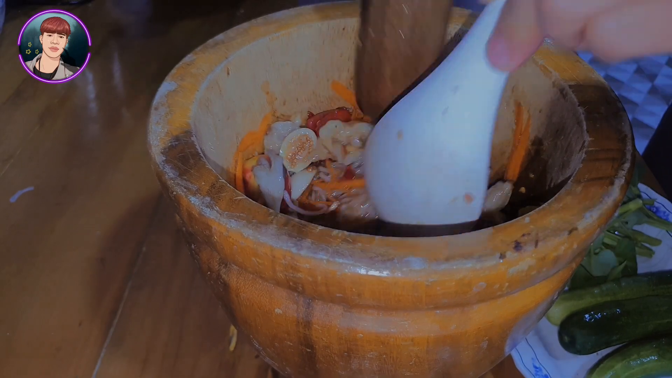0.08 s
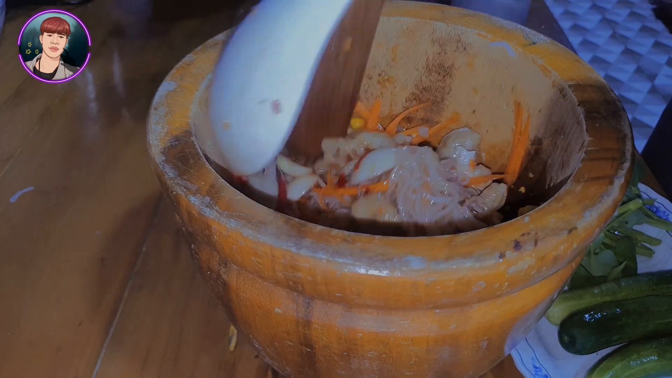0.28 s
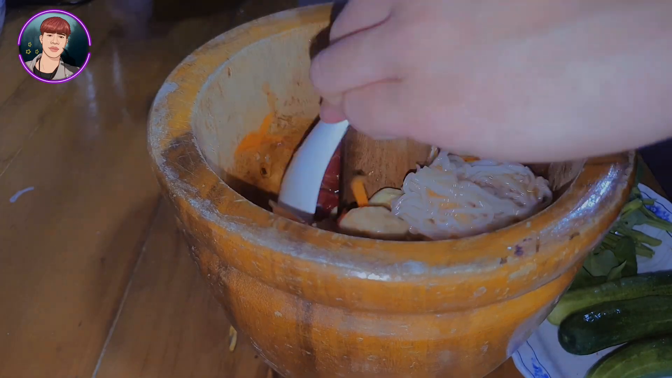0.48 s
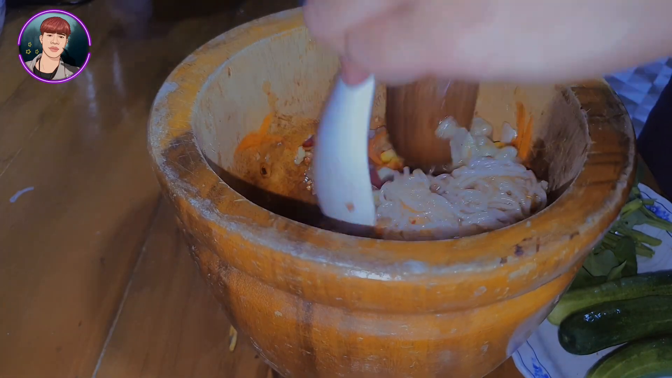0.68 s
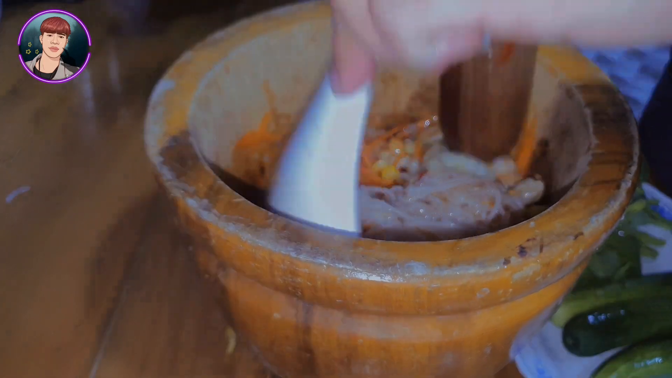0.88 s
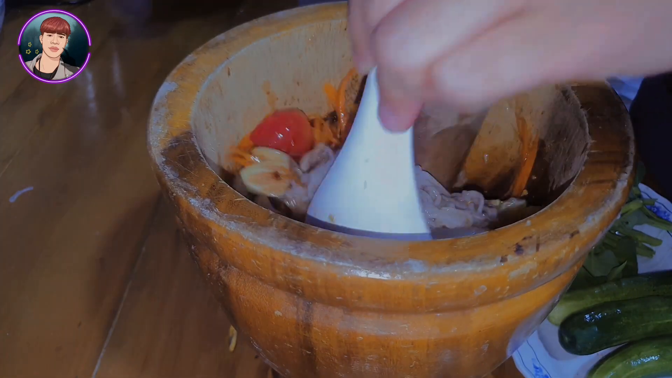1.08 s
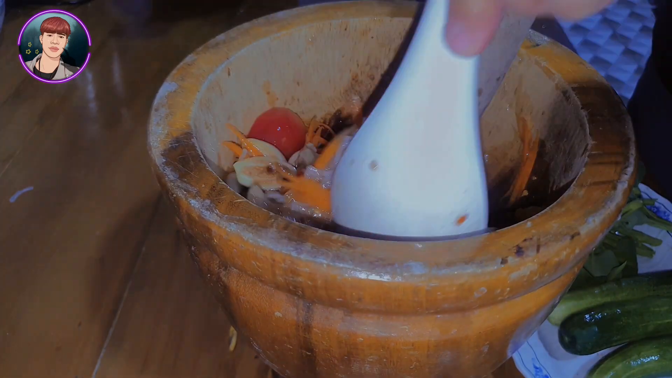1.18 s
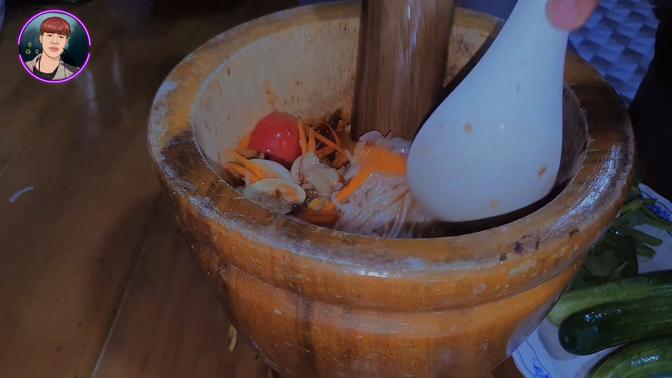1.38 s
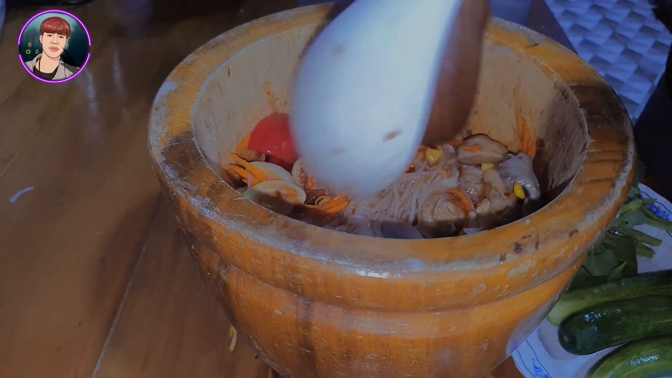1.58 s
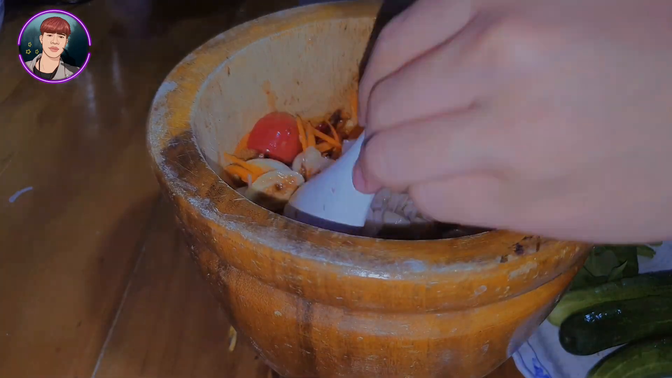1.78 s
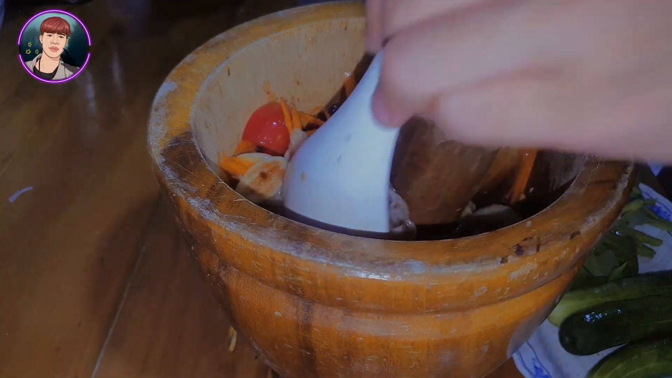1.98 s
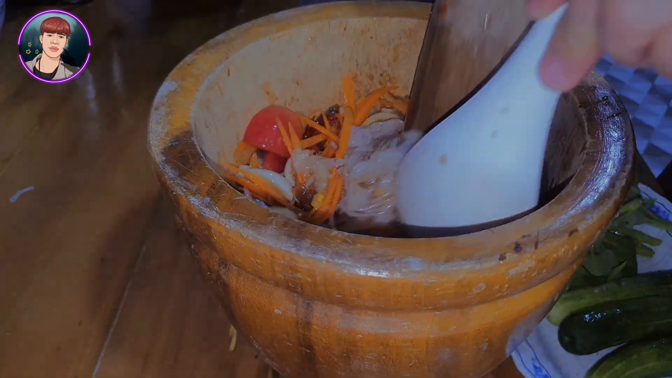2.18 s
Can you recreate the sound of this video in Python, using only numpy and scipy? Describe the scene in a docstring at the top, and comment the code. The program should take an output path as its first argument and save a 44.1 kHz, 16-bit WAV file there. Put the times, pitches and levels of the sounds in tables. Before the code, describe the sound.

Uneven dull thuds of a wooden pestle in a wooden mortar, wet food squelching, close in a kitchen

```python
"""Small, bare kitchen: a wooden pestle pounds a wet salad in a wooden mortar that stands on a table.
Blows ring decaying modes of bowl, table and room, over a low hum of coloured noise.
Clumped grains rumble low around each stroke, squelch and fizz; short noise bursts clack, tap and pop.
The spoon clicks in short high modes; glancing taps and slides sound the bowl's own note."""
import sys
import numpy as np
from scipy import signal
from scipy.fft import rfft, irfft, next_fast_len
from scipy.io import wavfile
from scipy.ndimage import uniform_filter1d, map_coordinates

SR = 44100
rng = np.random.default_rng(int(sys.argv[2]) if len(sys.argv) > 2 else 0)


def digitize_waveform(pressure):
    """Quantize a signal to 16-bit integers and store it at the path in sys.argv[1].

    Rows of a 2-D input are taken as channels; values are limited to [-1, 1].
    """
    field = np.atleast_2d(pressure).T
    bounded = np.clip(field, -1, 1)
    quanta = np.round(bounded * 32767).astype(np.int16)
    wavfile.write(sys.argv[1], SR, quanta)


N = 97020


def amp(db):
    """Decibels to gain."""
    return 10 ** (np.asarray(db) / 20)


def unit(x):
    """Scale to rms 1."""
    return x / np.sqrt(np.mean(x ** 2) + 1e-20)


def along(points, hz):
    """Interpolate (frequency [Hz], value) points on a log frequency axis."""
    point_hz, values = np.transpose(points)
    return np.interp(np.log(hz + 1), np.log(point_hz + 1), values)


def filtered(x, response):
    """Multiply the spectrum of x by a response of frequency."""
    n = x.shape[-1]
    padded = next_fast_len(n + SR // 4)
    hz = np.fft.rfftfreq(padded, 1 / SR)
    return irfft(rfft(x, padded) * response(hz), padded)[..., :n]


def spread(pair, colour):
    """Colour two unrelated signals and blend them into left and right, alike in the bass."""
    # Left-right likeness: (frequency [Hz], correlation [0-1])
    likeness = [(60, 1), (150, 0.86), (380, 0.81), (950, 0.21), (2400, 0), (15000, 0)]

    def mid_side_gains(hz):
        angle = np.arccos(np.clip(along(likeness, hz), -1, 1)) / 2
        return amp(along(colour, hz)) * [np.cos(angle), np.sin(angle)]

    mid, side = filtered(pair, mid_side_gains)
    return np.array([mid + side, mid - side])


def ring(modes, attack_s, pitch=1):
    """One second of exponentially decaying modes with a soft onset."""
    t = np.arange(SR) / SR
    tone = 0
    for hz, db, t60_s in modes:
        tone = tone + amp(db - 60 * t / t60_s) * np.sin(2 * np.pi * hz * pitch * t)
    return tone * (1 - np.exp(-t / attack_s))


def in_room(x, pan_db=0, wet_db=0, gap_s=0.002):
    """A sound at two microphone ports, plus a fresh diffuse tail: noise decaying per frequency."""
    # Decay of the kitchen: (frequency [Hz], t60 [s])
    decay = [(60, 0.5), (200, 0.35), (600, 0.51), (1500, 0.45), (5000, 0.43), (14000, 0.13)]
    # Tail colour, before wet_db: (frequency [Hz], level over the direct sound [dB])
    tail_colour = [(30, 1), (70, 5), (170, -1.5), (350, 5), (600, -1.5), (1100, 0.5), (2500, 0), (6000, -4),
                   (14000, -2)]
    port_lag_s = .00003

    hz, frame_s, spectrum = signal.stft(rng.standard_normal((2, SR)), SR, nperseg=256)
    t60_s = along(decay, hz)[:, None]
    unit_energy = np.sqrt(2 * np.log(1000) / (t60_s * SR))
    tail = signal.istft(spectrum * amp(-60 * frame_s / t60_s) * unit_energy, SR, nperseg=256)[1][:, :SR]
    t = np.arange(SR) / SR
    tail = spread(tail, tail_colour) * (1 - np.exp(-(t / gap_s) ** 2))

    sides = np.array([[1], [-1]])  # left, right
    direct = filtered(x, lambda f: amp(sides * pan_db / 2) * np.exp(-1j * np.pi * f * port_lag_s * sides))
    return direct + amp(wet_db) * signal.fftconvolve(x[None], tail, axes=1)[:, :len(x)]


def add(track, s, x):
    """Mix x into the track at time s [s]."""
    part = track[:, max(round(s * SR), 0):][:, :x.shape[-1]]
    part += x[..., :part.shape[1]]


def hum():
    """Steady low hum of the kitchen: coloured noise."""
    # Hum colour: (frequency [Hz], relative level [dB])
    colour = [(20, -44), (45, -4), (65, -4), (103, -3), (135, -8.5), (200, -18.5), (400, -39.5),
              (1400, -38.5), (3000, -34), (8500, -51.5), (15000, -58)]
    rms_db = -47.5
    return amp(rms_db) * unit(spread(rng.standard_normal((2, N)), colour))


def clumped(pair, depth_db):
    """Gather a crackle into brief clumps, each at a pitch of its own."""
    spectrum = signal.stft(pair, nperseg=256)[2]
    field = rng.standard_normal(spectrum.shape[1:])
    field = uniform_filter1d(field, size=5, axis=0)  # over frequency bins
    field = uniform_filter1d(field, size=4, axis=1)  # over time frames
    return signal.istft(spectrum * amp(depth_db * unit(field)), nperseg=256)[1][:, :N]


def crackle(colour, share, clump_db):
    """Dense tiny slips and bursts of uneven size; the room blurs all but a share of their power."""
    grains_per_s, grain_spread_db = 1100, 3
    hits = rng.random(N) < grains_per_s / SR
    sizes = amp(grain_spread_db * np.minimum(rng.exponential(size=N), 3))
    grains = unit(hits * sizes * rng.standard_normal((2, N)))
    blur = rng.standard_normal((2, N))
    mix = np.sqrt(share) * grains + np.sqrt(1 - share) * blur
    return unit(spread(clumped(mix, clump_db), colour))


def stirring():
    """Each stroke swells and fades: low rumble around it, squelch of the mix, fizz of the juice."""
    # Strokes through the mix: (peak time [s], swell [s per 20 dB], fade [s per 20 dB],
    # low rumble around the stroke: rubbing and the dying boom of blows [dB],
    # squelch [dB], wet fizz [dB])
    strokes = [(0.031, 0.91, 0.22, -42, -47.5, -59), (0.139, 0.14, 0.22, -79, -51, -56),
               (0.266, 0.098, 0.13, -28.5, -47, -83), (0.386, 0.092, 0.12, -28, -33.5, -39.5),
               (0.518, 0.14, 0.093, -37, -41.5, -49.5), (0.626, 0.13, 0.21, -60, -48.5, -53.5),
               (0.918, 0.055, 0.076, -33.5, -45, -44), (0.981, 0.076, 0.13, -36.5, -39.5, -46.5),
               (1.101, 0.11, 0.23, -34, -43.5, -58), (1.36, 0.12, 0.34, -70, -50, -77),
               (1.48, 0.23, 0.24, -52.5, -55, -55), (1.733, 0.04, 0.75, -57, -61.5, -53.5),
               (1.788, 0.045, 0.078, -43, -42, -47), (1.918, 0.19, 0.15, -32, -42, -65),
               (2.07, 0.326, 0.22, -54, -54, -63.5), (2.18, 0.25, 0.25, -52, -56, -60)]
    # Colours of the three parts: (frequency [Hz], relative level [dB])
    rumble_colour = [(30, -23.5), (95, 8.5), (200, -12), (330, -4), (540, -4.5), (750, -8), (1000, -41),
                     (1600, -40), (4000, -57)]
    squelch_colour = [(300, -50), (800, 2.5), (1200, -1.5), (1800, 0), (2600, -4), (4000, -10), (7000, -18),
                      (15000, -45)]
    fizz_colour = [(1000, -48), (3000, 2.5), (5000, -1.5), (7000, -3), (10500, -6.5), (13000, -14),
                   (15500, -21.5)]

    t, power = np.arange(N) / SR, np.zeros((3, N))
    for peak_s, swell_s, fade_s, *levels_db in strokes:
        shape_db = -20 * np.maximum((peak_s - t) / swell_s, (t - peak_s) / fade_s)
        power += amp(np.array(levels_db)[:, None] + shape_db) ** 2
    rumble, squelch, fizz = np.sqrt(power)
    out = rumble * crackle(rumble_colour, share=0.15, clump_db=5.5)
    out += squelch * crackle(squelch_colour, share=0.38, clump_db=1)
    out += fizz * crackle(fizz_colour, share=0.61, clump_db=4.0)
    return out


def knocks():
    """Each blow rings bowl, table and room; the more food cushions it, the lower its cut-off."""
    # Pestle and spoon on the mortar: (time [s], bowl [dB], table thump [dB],
    # thump pitch factor, contact cut-off [Hz], left-right [dB])
    blows = [(.009, -31, -31.5, 0.88, 1180, 6), (.055, -42, -32.5, 1.2, 1220, 4),
             (.109, -33.5, -56, 1, 2200, 2), (.200, -23, -22.5, 1.72, 500, 3.5),
             (0.2245, -18, -16, 1.22, 1260, 1.5), (.252, -24, -18, 1.8, 397, -0.5),
             (.356, -25.5, -29, 2.35, 1200, 1.5), (0.3842, -8, -5, 1.24, 810, 3.5),
             (.425, -6, -3.5, 1.04, 670, 2), (0.447, -7.5, -9, 1.36, 586, 8),
             (0.46, -9, -12, 1.59, 494, -1), (0.712, -37.5, -59, 1.5, 1890, 4),
             (.793, -44.5, -55, 1, 1212, -1), (.860, -24.5, -68, 0.8, 2200, -5),
             (.896, -29, -35, 1.38, 1080, 7), (0.92, -50.5, -21, 0.91, 497, 4),
             (1.005, -36, -21.5, 1.07, 690, 1), (1.083, -4, -6.5, 1.35, 1300, 2.5),
             (1.32, -35, -43, 1, 1240, 1), (1.72, -35, -24.5, 0.87, 1040, 6),
             (1.807, -28.5, -23, 1.4, 740, 1), (1.871, -9, -11, 1.45, 1020, 2.5),
             (2.042, -26.5, -16, 0.94, 940, 2.5)]
    # Modes of the bowl and of the table under it: (frequency [Hz], relative level [dB], t60 [s])
    bowl_modes = [(325, -8, 0.047), (569.7, -7.5, 0.067), (625.4, 0, 0.029), (737.4, -2.5, 0.025),
                  (849, -9, 0.028), (1058, -7.5, 0.032), (1183, -26, 0.0092)]
    table_modes = [(67.4, -3.5, 0.065), (103, 3.5, 0.051), (150.5, -8, 0.066), (232.5, -6.5, 0.029)]
    # Standing waves fed by the table (low) and the bowl (high):
    # (frequency [Hz], relative level [dB], t60 [s])
    room_low_modes = [(91.54, -21.5, 0.41), (167.2, -13, 0.31), (224.5, -24, 0.35), (291.2, -27.5, 0.33)]
    room_high_modes = [(341.3, -22.5, 0.26), (391, -21.5, 0.35), (495.7, -22.5, 0.25), (539, -28, 0.43),
                       (658, -22.5, 0.34), (717.4, -23.5, 0.38), (781, -33.5, 0.44), (1072, -28, 0.34)]
    contact_s, room_build_s = 0.001, 0.007
    tail_db = -3.5
    wall_echo_s, wall_echo_db = 0.008834, -13  # return from the nearest wall

    out = np.zeros((2, N))
    bowl = ring(bowl_modes, contact_s)
    low, high = ring(room_low_modes, room_build_s), ring(room_high_modes, room_build_s)
    for s, bowl_db, thump_db, pitch, cut_hz, pan_db in blows:
        cushion = signal.butter(4, cut_hz, fs=SR, output="sos")
        table = ring(table_modes, attack_s=0.0069, pitch=pitch)
        direct = signal.sosfilt(cushion, amp(bowl_db) * bowl - amp(thump_db) * table)
        boom = signal.sosfilt(cushion, amp(bowl_db) * high - amp(thump_db) * low)
        add(out, s, in_room(direct, pan_db, wet_db=tail_db) + boom)
        add(out, s + wall_echo_s, amp(wall_echo_db) * direct)
    return out


def pops():
    """Short noise bursts around one pitch: clacks, light taps, part of the spoon click, popping food."""
    # Clacks, taps and pops: (time [s], level [dB], centre [Hz], width [octaves], t60 [s])
    bursts = [(.009, -26.5, 687, 0.25, 0.035), (0.036, -40, 1820, 0.41, 0.016),
              (.055, -28.5, 2020, 0.73, 0.011), (0.1095, -25, 1230, 1.34, 0.01),
              (.176, -43, 4140, 1.1, 0.047), (0.226, -42, 1960, 1.03, 0.11), (.366, -41, 1800, 0.49, .04),
              (.396, -15, 1720, 0.31, 0.015), (0.399, -16, 1660, 0.44, 0.014),
              (0.405, -25, 1076, 0.17, .13), (0.411, -26, 6600, 0.26, 0.0096),
              (0.435, -29, 1120, 0.89, 0.071), (0.498, -28.5, 8100, 0.77, 0.012),
              (0.614, -40, 4000, 0.88, 0.018), (.669, -41, 3160, 1.4, 0.034),
              (0.676, -27, 1120, 0.26, 0.016), (.7115, -32.5, 850, 1.7, 0.016),
              (0.859, -25.5, 9000, 0.56, 0.019), (0.8608, -33.5, 1780, 2.8, 0.022),
              (0.943, -36, 9250, 0.96, 0.066), (0.9797, -31, 2200, 0.4, 0.024),
              (0.991, -38, 2400, 0.74, 0.012), (1.023, -32, 1750, .5, 0.02), (1.068, -36, 2170, .6, .012),
              (1.268, -32, 860, 0.39, 0.023), (1.443, -44, 900, 0.56, 0.077),
              (1.512, -42, 6360, 0.16, 0.028), (1.786, -41.5, 4200, 0.87, 0.11),
              (1.863, -30.5, 2150, 0.48, 0.078), (1.871, -22, 1530, 1.48, 0.035),
              (2.042, -33, 900, 1.15, 0.039), (2.176, -34, 800, 0.37, 0.027),
              (2.191, -19.5, 800, 0.23, 0.0096)]
    attack_s, tail_db = 0.0018, -7

    out, t = np.zeros((2, N)), np.arange(SR // 2) / SR
    for s, db, centre_hz, octaves, t60_s in bursts:
        def band(hz):
            offset = np.log2((hz + 1) / centre_hz) / octaves
            return 1 / (1 + offset ** 2) ** 2

        burst = unit(filtered(rng.standard_normal(len(t)), band))
        envelope = amp(db - 60 * t / t60_s) * (1 - np.exp(-t / attack_s))
        add(out, s, in_room(envelope * burst, wet_db=tail_db))
    return out


def rim():
    """A glancing tap sounds the hollow bowl's note, sagging a little, roughened by chattering contact."""
    # Taps that leave the rim free to ring: (time [s], level [dB], left-right [dB])
    taps = [(.225, -15, -14.5), (.386, -26.5, -11), (1.872, -29, -24)]
    # Rim modes, before the sag: (frequency [Hz], relative level [dB], t60 [s])
    modes = [(532, -6.5, 0.25), (582, -31.5, 0.22), (1027, -17, 0.087)]
    attack_s = .0013
    sag, sag_s = 0.06, 0.063  # starts sharp by this share, settles on this time scale
    chatter_per_s, roughness = 111.4, .3
    room_db = -3.5  # centred copy with its tail

    out, t = np.zeros((2, N)), np.arange(SR) / SR
    pitch = 1 + sag / (1 + t / sag_s)
    for s, db, pan_db in taps:
        chatter = map_coordinates(rng.standard_normal(SR // 20), [t * chatter_per_s], mode="wrap")
        note = amp(db) * ring(modes, attack_s, pitch) * (1 + roughness * chatter)
        panned = note * amp([[pan_db / 2], [-pan_db / 2]])
        add(out, s, panned + amp(room_db) * in_room(note))
    return out


def slides():
    """The spoon drags along the wall: its slips keep the bowl's note sounding, unsteady and gliding."""
    # Slides: (start [s], length [s], level [dB], start pitch [Hz], end pitch [Hz])
    drags = [(0.271, 0.13, -35, 548, 520), (0.864, 0.048, -45, 531, 521), (0.934, 0.129, -41, 564, 520),
             (0.956, 0.09, -43, 411.6, 439), (1.93, .11, -43, 534.5, 555)]
    slips_per_s, waver_share, grip_db = 150, .04, 3

    out = np.zeros((2, N))
    for s, length_s, db, start_hz, end_hz in drags:
        t = np.arange(round(length_s * SR)) / SR
        rows = rng.standard_normal((2, SR // 100))
        grip, waver = (map_coordinates(row, [t * slips_per_s], mode="wrap") for row in rows)
        hz = np.interp(t, [0, length_s], [start_hz, end_hz]) * (1 + waver_share * waver)
        note = np.sin(2 * np.pi * np.cumsum(hz) / SR) * amp(db + grip_db * grip)
        faded = note * signal.windows.tukey(len(t), .5)
        add(out, s, in_room(np.pad(faded, (0, SR // 2))))  # padding holds the tail
    return out


def spoon():
    """Hard contacts ring the spoon briefly; its pitch depends on how it is pressed."""
    # Clicks: (time [s], level [dB], mode pitch factor, left-right [dB])
    clicks = [(0.859, -32, 1.0, -9), (1.8726, -22.5, 0.89, -10), (1.881, -27, 0.94, 7.5)]
    # Spoon modes, before the pitch factor: (frequency [Hz], relative level [dB], t60 [s])
    modes = [(3200, -12, 0.014), (5740, 0, 0.011), (6070, -4, 0.014), (8460, -29, 0.0082),
             (10200, -26, 0.0133), (11950, -12, 0.012)]

    out = np.zeros((2, N))
    for s, db, pitch, pan_db in clicks:
        add(out, s, in_room(amp(db) * ring(modes, attack_s=0.00044, pitch=pitch), pan_db))
    return out


def scene():
    """Hum, wet mix, knocks and spoon together."""
    return hum() + stirring() + knocks() + pops() + rim() + slides() + spoon()


def record(dry):
    """The microphone thins the deep bass and keeps nothing above its band limit."""
    bass_cut_hz, top_hz = 52, 15500
    thin = signal.sosfilt(signal.butter(4, bass_cut_hz, "high", fs=SR, output="sos"), dry)
    return filtered(thin, lambda hz: hz < top_hz)


dry = scene()
out = record(dry)
digitize_waveform(out)
```